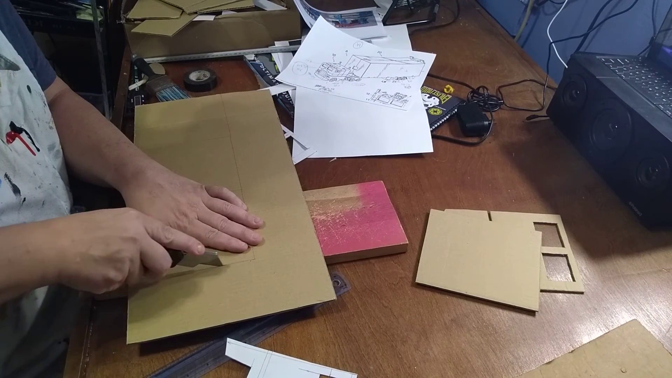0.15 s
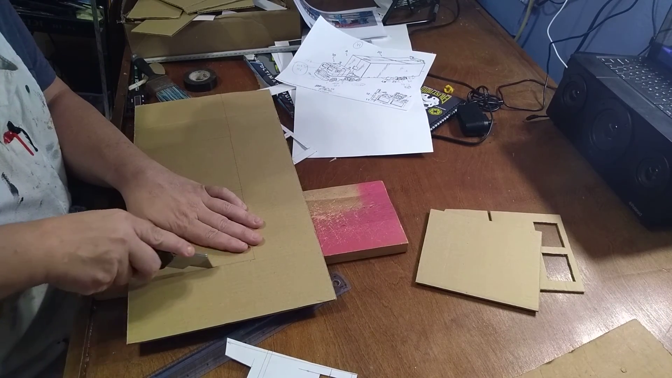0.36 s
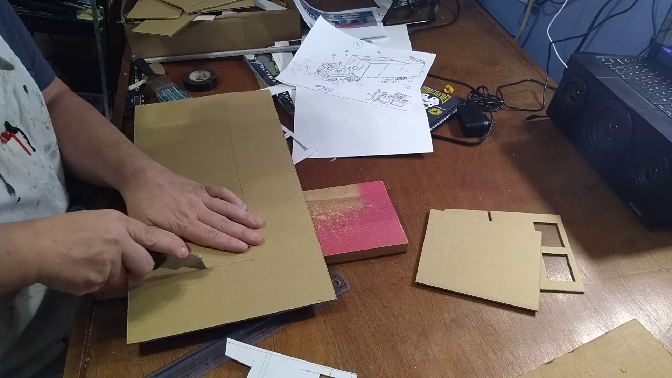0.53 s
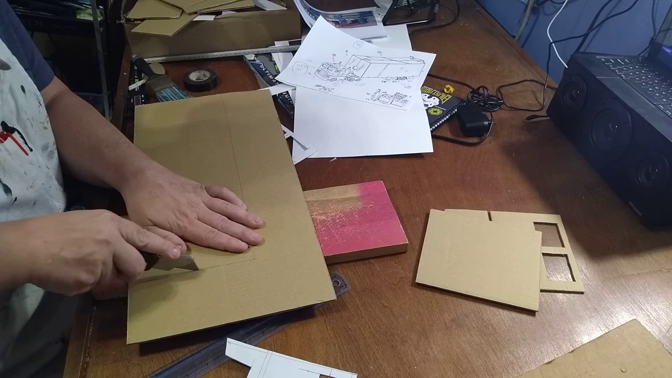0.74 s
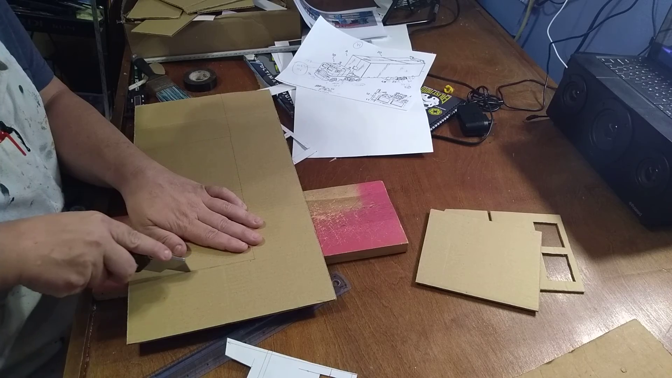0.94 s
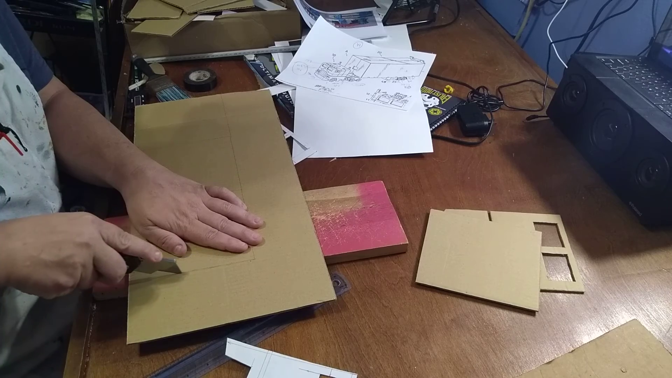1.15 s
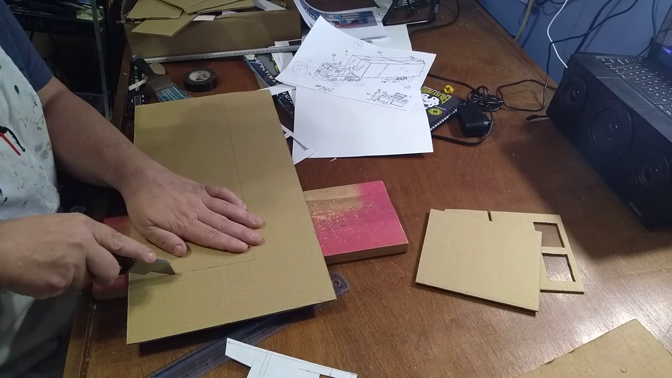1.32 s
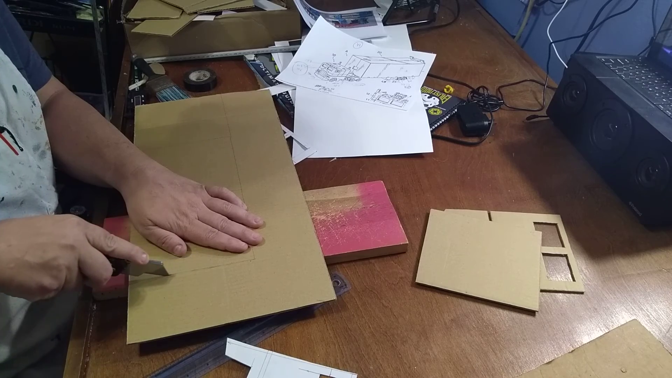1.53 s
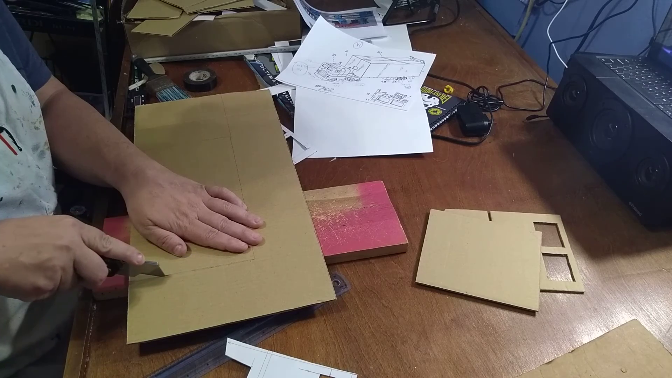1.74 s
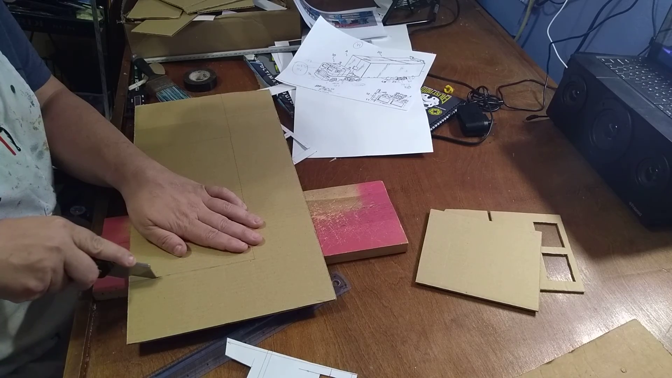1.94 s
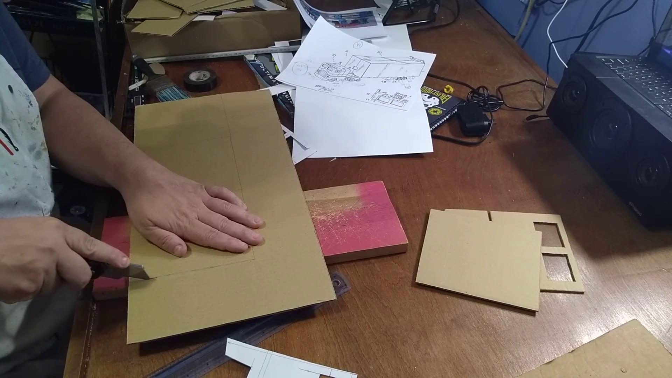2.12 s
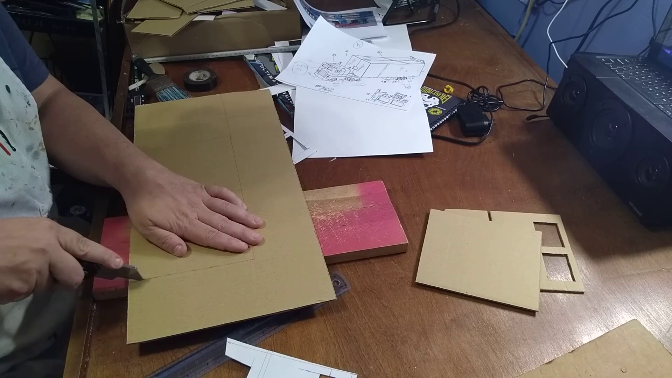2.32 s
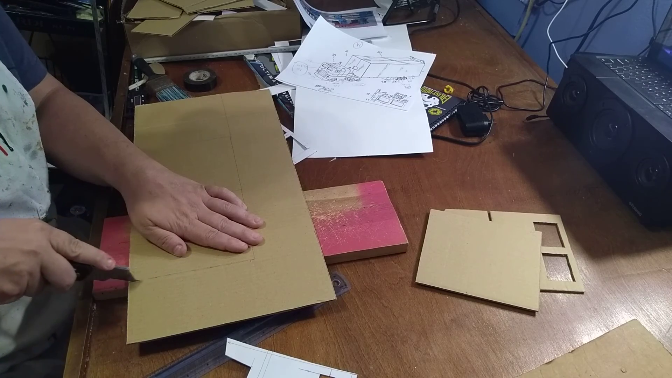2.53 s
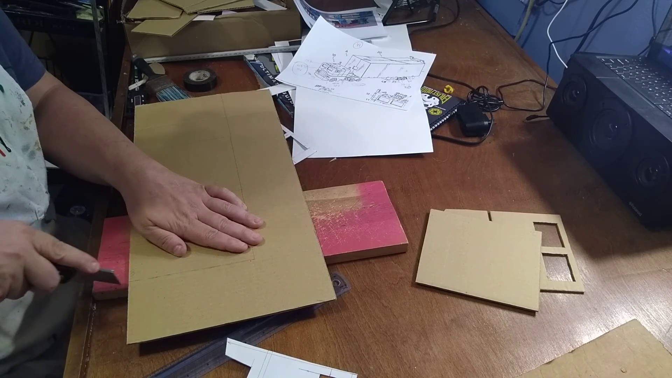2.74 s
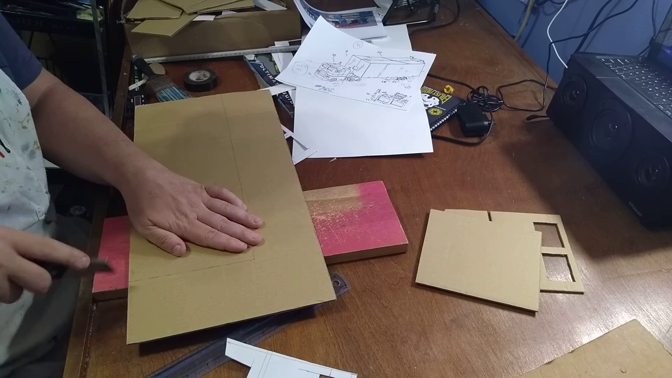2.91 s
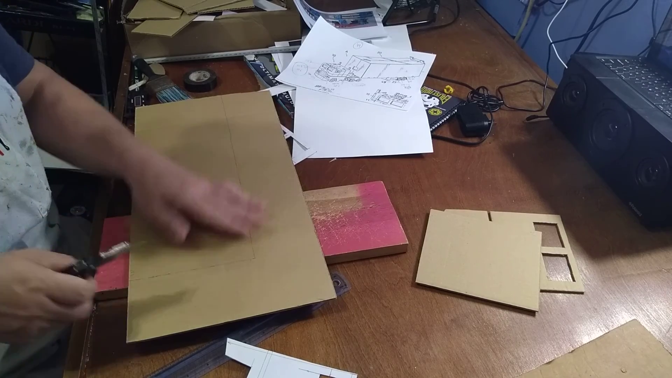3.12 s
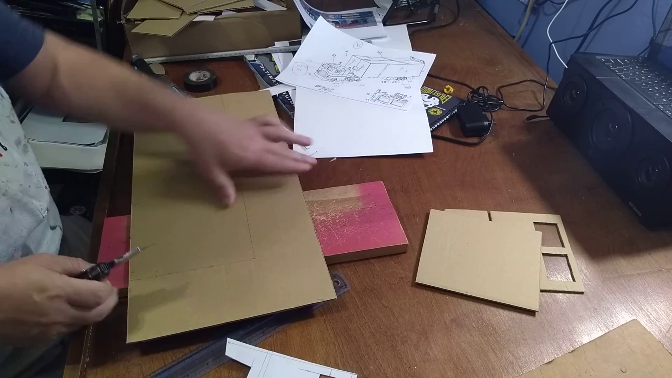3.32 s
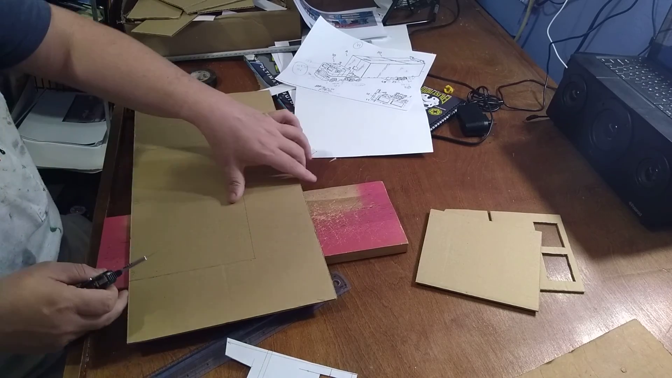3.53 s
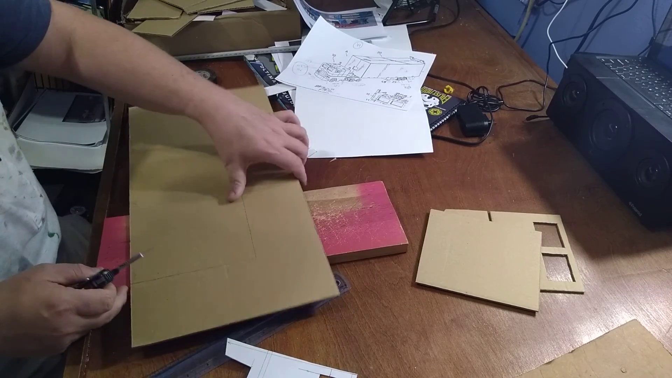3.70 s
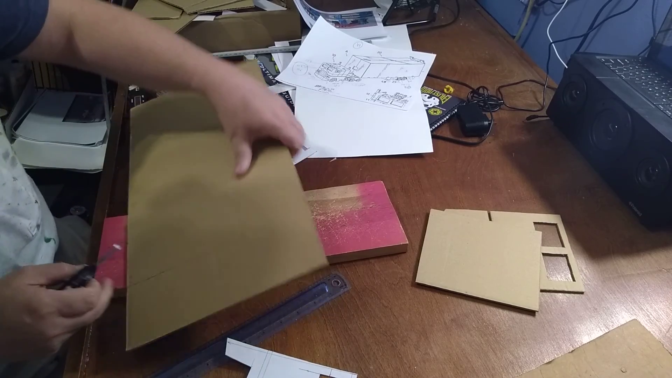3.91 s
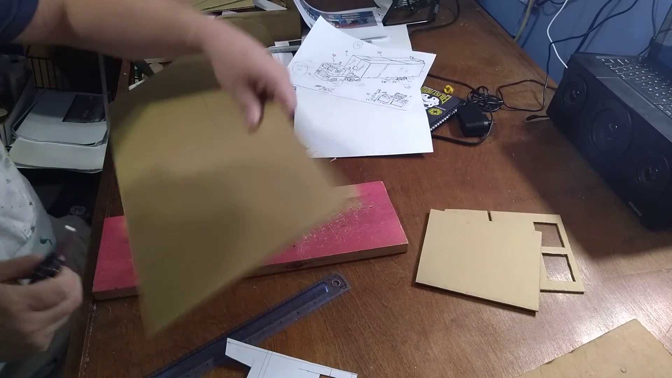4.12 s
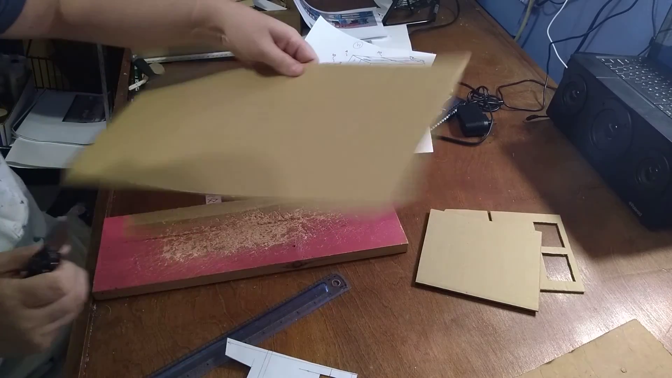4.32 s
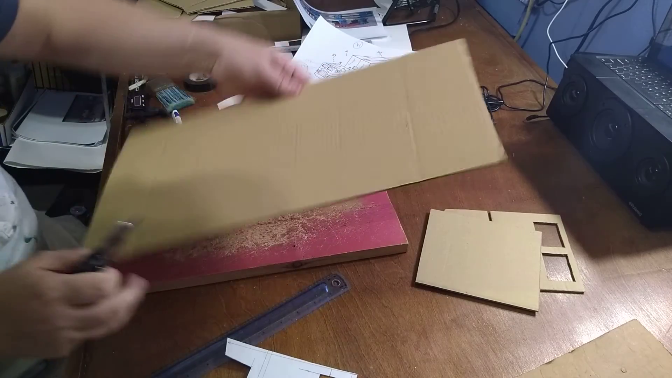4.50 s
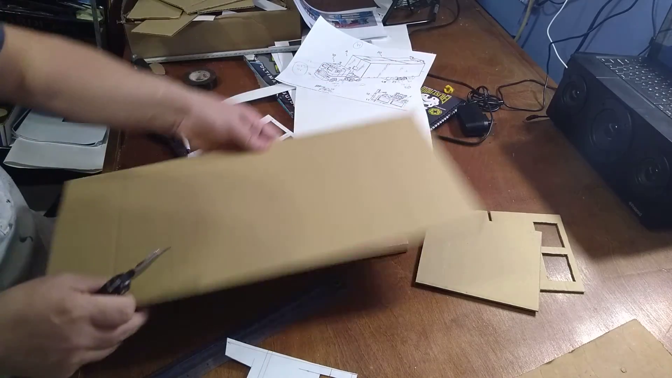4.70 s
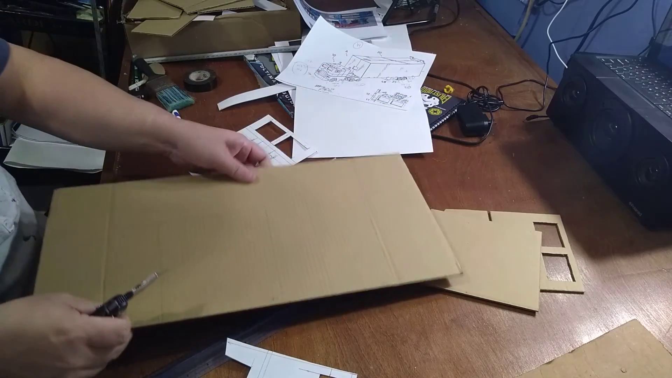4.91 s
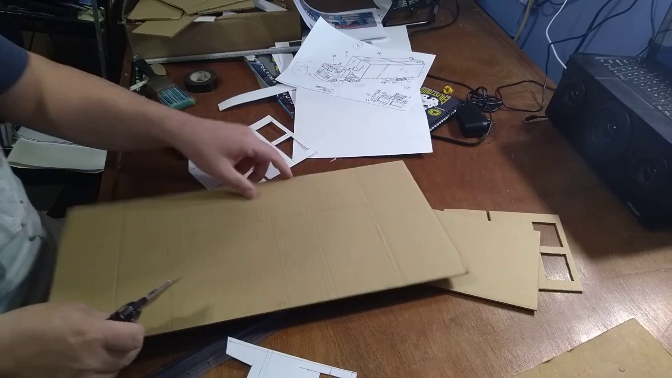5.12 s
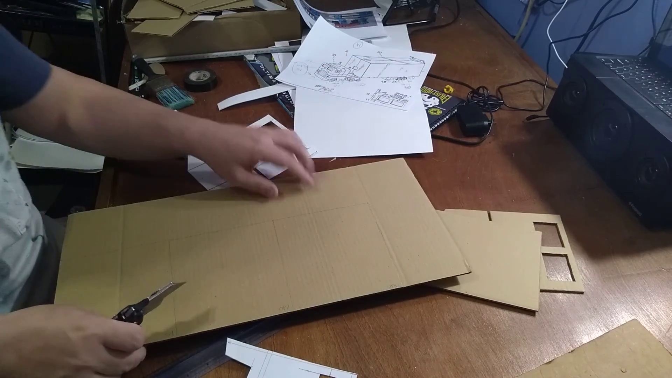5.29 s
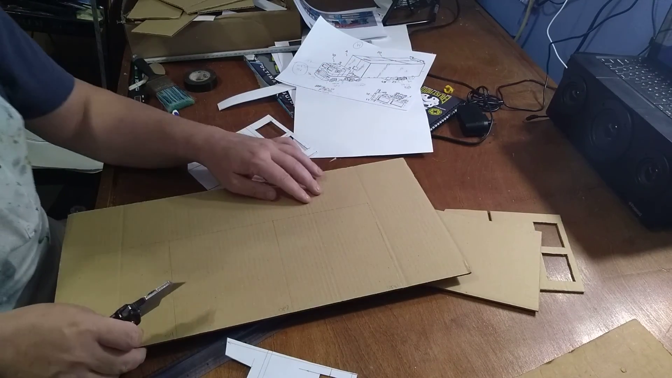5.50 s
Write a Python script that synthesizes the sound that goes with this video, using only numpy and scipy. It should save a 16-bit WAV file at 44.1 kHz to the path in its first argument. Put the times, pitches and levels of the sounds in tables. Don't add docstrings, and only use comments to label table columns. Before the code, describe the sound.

In a small room with a low fan hum, a utility knife tears steadily through corrugated cardboard for under three seconds, rasping and fizzing in uneven surges with a thin steely sing. The blade runs out, the sheet pats and knocks, hands slide and flex it, then it lands with a sharp slap, drums briefly and settles. Close microphone, wide stereo.

```python
import sys
import numpy as np
from scipy import signal
from scipy.fft import rfft, irfft, next_fast_len
from scipy.io import wavfile
from scipy.ndimage import uniform_filter1d, map_coordinates

SR = 44100
rng = np.random.default_rng(int(sys.argv[2]) if len(sys.argv) > 2 else 0)


def voltage_ratio(decibels):
    exponent = np.asarray(decibels, float) / 20
    return 10 ** exponent


def pcm_store(signal):
    levels = np.round(np.clip(np.atleast_2d(signal), -1, 1) * 32767)
    wavfile.write(sys.argv[1], SR, levels.astype(np.int16).T)


N = 244755

# (frequency [Hz], width [Hz], level [dB])
LOOSE_MODES = [(392, 35, -7.5), (611, 11, -5.5), (966, 190, -5.5), (1384, 16, -11), (1490, 28, -43)]


def unit(x):
    return x / np.sqrt(np.mean(x ** 2) + 1e-20)


def along(points, hz):
    f, v = np.transpose(points)
    return np.interp(np.log(hz + 1), np.log(f + 1), v)


def wobble(rate_hz):
    knots = rng.standard_normal(int(N * rate_hz / SR) + 4)
    return map_coordinates(knots, [np.arange(N) * rate_hz / SR])


def sampled(x):
    return np.interp(np.arange(N) / SR * 1000, np.arange(len(x)), x)


def away(start_s, rise_s, hold_s, fall_s):
    t = np.arange(0, N / SR + .002, .001)
    before = (start_s - t) / rise_s
    after = (t - start_s - hold_s) / fall_s
    return np.maximum(np.maximum(before, after), 0)


def bumped(*shape):
    return np.maximum(1 - away(*shape), 0)


def swells(rows):
    power = sum(voltage_ratio(db - 20 * away(*shape)) ** 2 for *shape, db in rows)
    return sampled(np.sqrt(power))


def filtered(x, response):
    m = next_fast_len(N + SR // 2)
    return irfft(rfft(x, m) * response(np.fft.rfftfreq(m, 1 / SR)), m)[..., :N]


def modes(f, peaks):
    total = 0
    for k, (centre, width, db) in enumerate(peaks):
        damping = 1j * f * width
        total = total + (-1) ** k * voltage_ratio(db) * damping / (centre * centre - f * f + damping)
    return total


def at_ports(pair, response):
    # (frequency [Hz], likeness [-1..1])
    likeness = [(30, .9), (80, 0.93), (300, 0.93), (600, 0.64), (1100, -0.21), (3200, -0.23), (6000, 0.087),
                (12000, 0.37)]
    turn = lambda f: np.arccos(np.clip(along(likeness, f), -1, 1)) / 2
    mid, side = filtered(pair, lambda f: response(f) * [np.cos(turn(f)), np.sin(turn(f))])
    return unit(np.array([mid + side, mid - side]))


def rumble():
    # (time [s], rise [s], hold [s], fall [s], level [dB])
    jolts = [
        (.26, 0.089, .05, 1, -52.5),
        (2.7, 0.26, .05, 0.53, -54.5),
        (3.2, .2, 0.018, 0.16, -61),
        (4, .3, .05, 0.51, -60.5),
        (5, .02, 0.064, 0.35, -54),
        (2.93, .08, 0.034, .15, -56),
        (5.12, .08, .16, .15, -52),
        (5.44, .1, 0.016, .15, -55.5),
    ]
    steady_db, of_pressure_db, sway_db = -61.5, -17.5, 1.64
    power = voltage_ratio(2 * steady_db) + (voltage_ratio(of_pressure_db) * blade()[0]) ** 2 + swells(jolts) ** 2
    return np.sqrt(power) * voltage_ratio(sway_db * wobble(6.9))


def fan():
    # (frequency [Hz], level [dB per Hz])
    air_colour = [(80, -39), (200, 5.5), (450, -7.5), (900, -8.5), (2300, -11), (5000, -14.5), (9000, -16),
                  (14000, -38)]
    # (frequency [Hz], level [dB per Hz])
    low_colour = [(15, -13), (35, -4), (62, -2), (120, -0.5), (200, -9.5), (320, -31.5)]
    # (frequency [Hz], level [dB rms])
    hum_tones = [(63, -60), (119.6, -62), (208, -64), (361, -64), (479, -63.5), (598, -74)]
    # (time [s], rise [s], hold [s], fall [s], level [dB])
    shade = (5, 0.3, 0.4, 0.26, -4.5)
    t = np.arange(N) / SR
    air = at_ports(rng.standard_normal((2, N)), lambda f: voltage_ratio(along(air_colour, f)))
    low = at_ports(rng.standard_normal((2, N)), lambda f: voltage_ratio(along(low_colour, f)))
    hum = 0
    for hz, db in hum_tones:
        level = voltage_ratio(db + 5.0 + 3.2 * wobble(9))
        drift = hz / 220 * wobble(24)
        port_drift = 0.43 * np.array([wobble(3.0), wobble(2.95)])
        hum = hum + level * np.sin(2 * np.pi * hz * t + drift + port_drift)
    air_db = -52.0 + shade[4] * sampled(bumped(*shade[:4])) + 1.73 * wobble(3.144)
    return voltage_ratio(air_db) * air + voltage_ratio(7.5) * rumble() * low + hum


def bump():
    # (time [s], peak [dB], pitch [Hz], t60 [s])
    jolt = (2.5, -43, 59.5, 1.5)
    start_s, db, hz, t60_s = jolt
    t = np.clip(np.arange(N) / SR - start_s, 0, None)
    return voltage_ratio(db - 60 * t / t60_s) * np.sin(2 * np.pi * hz * t) * [[1], [-.3]]


def contacts(rows, attack_s):
    out, t = np.zeros(N + SR), np.arange(SR // 10) / SR
    for start_s, db, hz, t60_s in rows:
        ring = np.sin(2 * np.pi * hz * t) * (1 - np.exp(-t / attack_s))
        out[round(start_s * SR):][:len(t)] += voltage_ratio(db - 60 * t / t60_s) * ring
    return out[:N]


def bright_ticks():
    # (time [s], peak [dB], pitch [Hz], t60 [s])
    catches = [(3.7027, -26, 10300, .004), (3.7027, -34, 11800, .004), (4.9988, -27, 10000, .002),
               (4.9988, -30, 13800, .002), (4.1608, -37, 12200, .006), (4.1628, -34, 12100, .005),
               (4.1628, -37, 9100, .005), (4.1647, -35, 12000, .006), (4.167, -37, 12000, .006),
               (4.1691, -40, 11900, .005), (4.6506, -28, 2300, .004), (4.6557, -20, 9760, .004),
               (4.6619, -11, 9500, .004), (4.6619, -21, 7700, .004), (4.6626, -27, 12300, .008),
               (4.6627, -14, 10300, .006), (1.8992, -34, 12300, .008), (1.9689, -32, 12300, .008),
               (2.0122, -30, 12400, .012), (2.0981, -37, 12200, .008), (2.2, -31, 12300, .008),
               (2.2585, -31, 12200, .006), (2.263, -31, 12200, .006), (2.3516, -33, 12300, .008),
               (2.5396, -33, 12300, .008), (2.6274, -30, 12300, .008)]
    return contacts(catches, attack_s=.00015)


def edge_pats():
    # (time [s], peak [dB], pitch [Hz], t60 [s])
    short_rings = [(2.8358, -28, 610, 0.022), (2.8505, -33, 780, .02), (3.033, -36, 1010, .02),
                   (3.034, -37, 1600, .02), (3.078, -39, 1200, .03), (3.155, -44, 870, .04),
                   (3.159, -39.5, 1595, .03), (3.213, -46, 1000, .02), (3.7033, -30, 1000, 0.02),
                   (3.724, -36, 1200, 0.048), (3.968, -33, 980, 0.037), (3.973, -27.5, 614, .03),
                   (3.977, -30, 991, 0.027), (3.975, -34, 3590, 0.038), (3.988, -32, 990, 0.026),
                   (4.646, -32, 640, 0.046), (4.651, -36, 1380, .02), (4.654, -29, 990, .03),
                   (4.66, -28, 984, .03), (4.672, -26.5, 590, .05), (4.677, -32.5, 1356, 0.071),
                   (4.683, -31, 600, .05), (4.692, -27, 598, 0.045), (4.7, -33, 800, 0.044),
                   (4.708, -30, 417, 0.046), (4.753, -38, 783, .03), (4.7685, -26.5, 590, .03),
                   (4.774, -32.5, 967, .05), (4.798, -32, 957, .04), (4.812, -37, 796, .04),
                   (4.826, -40, 600, .03), (4.853, -41, 565, .04), (5.014, -25.5, 598, .05),
                   (5.024, -33, 600, .05), (5.04, -34, 1230, .05), (5.055, -34, 1690, .03),
                   (5.066, -36, 1230, .06), (5.078, -35, 480, .05), (5.168, -36.5, 813, .04),
                   (5.174, -38, 1394, .03), (5.19, -33, 520, 0.05), (5.202, -35, 600, .03),
                   (5.227, -33, 750, .03), (5.234, -32, 420, .04), (2.842, -35, 720, .03),
                   (2.865, -37, 900, .03),
                   (2.558, -39, 1160, .1), (2.572, -39, 1180, .08), (2.59, -42, 1250, .06),
                 (2.61, -43, 1080, .08), (2.638, -40, 1110, .06), (2.645, -38, 900, .05),
                 (2.648, -35, 620, .04), (2.69, -45, 930, .08), (2.705, -40, 600, .05),
                 (2.735, -47, 1150, .08), (2.76, -46, 900, .06), (2.8545, -37, 3400, .012),
                 (3.9735, -22, 850, .012), (4.6465, -34, 950, .025), (4.668, -31, 400, .05),
                 (4.684, -31, 380, .05), (4.79, -36, 420, .05), (5.008, -28, 400, .06),
                 (5.045, -33, 380, .06), (3.0345, -42, 3300, .01), (3.159, -42, 3100, .012)]
    return contacts(short_rings, attack_s=0.001)


def knocks():
    # (time [s], peak [dB], tick [dB], t60 [s])
    pushes = [(2.835, -36, -60, 0.067), (3.033, -38, -52, 0.081), (3.076, -35, -45, 0.13),
              (3.152, -30.5, -33.5, 0.17), (3.703, -30, -36, 0.12), (4.161, -39, -45, 0.16),
              (4.651, -24, -35, 0.19), (4.662, -28, -24, 0.15), (4.768, -34, -41, 0.22),
              (5.169, -29, -55, 0.068), (5.188, -28, -60, .07), (5.225, -32, -61, 0.11),
              (5.518, -39, -55, 0.15)]
    # (time [s], peak [dB])
    fibre_snaps = [(0.2463, -9), (0.2954, -20), (0.952, -13), (1.0774, -20), (1.397, -28), (2.0981, -18),
                   (2.8827, -21), (3.3677, -41), (4.759, -38.5), (4.8713, -41), (5.3338, -31)]
    out, t = np.zeros(N + SR), np.arange(SR // 4) / SR
    for start_s, db, tick_db, t60_s in pushes:
        hz, _, level_db = np.transpose(LOOSE_MODES)[..., None]
        hz = hz * (1 + 0.0403 * rng.standard_normal(hz.shape))
        drift = 0.032 * np.cumsum(rng.standard_normal((len(hz), len(t))), axis=1)
        uneven = voltage_ratio(level_db + rng.normal(0, 4.5, hz.shape))
        ring = (uneven * np.sin(2 * np.pi * hz * t + drift)).sum(0) * (1 - np.exp(-t / 0.001))
        tick = np.diff(rng.standard_normal(len(t) + 1)) * voltage_ratio(tick_db - 8.0 - 60 * t / .02)
        out[round(start_s * SR):][:len(t)] += voltage_ratio(db - 14.5 - 60 * t / t60_s) * ring + tick
    for start_s, db in fibre_snaps:
        snap = np.diff(rng.standard_normal(len(t) + 1))
        out[round(start_s * SR):][:len(t)] += voltage_ratio(db - 16.0 - 60 * t / 0.005) * snap
    return out[:N]


def slap():
    # (time [s], peak [dB], pitch [Hz], t60 [s])
    cracks = [
        (5.0003, -18.5, 950, 0.01),
        (4.9988, -7, 1840, 0.0032),
        (4.9988, -17, 2330, 0.006),
        (4.9988, -7, 2880, 0.0028),
        (5.0068, -21, 740, 0.014),
        (5.2247, -25.5, 2070, 0.0053),
        (5.231, -30.5, 400, 0.05),
        (3.0765, -34, 2120, 0.0068),
        (2.8, -44, 1230, 0.009),
        (3.867, -41, 1200, 0.066),
    ]
    # (frequency [Hz], level [dB], t60 [s])
    drum_modes = [(457, -14, 0.89), (595, 0, 0.11), (1230, -4, 0.098), (1740, -17, 0.81), (2240, -29, 0.12),
                  (3080, -39, 0.27)]
    t = np.clip(np.arange(N) / SR - np.transpose(cracks)[0][:, None], 0, None)
    crack = sum(voltage_ratio(db - 60 * u / t60_s) * np.sin(2 * np.pi * hz * u)
                for u, (_, db, hz, t60_s) in zip(t, cracks))
    since = t[0]
    drum = sum(voltage_ratio(db - 60 * since / min(t60_s, .3)) * np.sin(2 * np.pi * hz * since)
               for hz, db, t60_s in drum_modes)
    return crack + voltage_ratio(-25) * drum * (1 - np.exp(-since / .006))


def fibres(per_s, spread_db):
    size = (rng.random(N) < per_s / SR) * voltage_ratio(spread_db * rng.exponential(size=N))
    burst = signal.lfilter([1], [1, -.93], size)
    z = signal.stft((burst + 1.02) * rng.standard_normal((2, N)), nperseg=512)[2]
    patches = uniform_filter1d(rng.standard_normal(z.shape[1:]), size=5, axis=0)
    patches = uniform_filter1d(patches, size=7, axis=1)
    return signal.istft(z * voltage_ratio(1.91 * unit(patches)), nperseg=512)[1][:, :N]


def friction(drive, peaks, bright, ring, per_s, spread_db, flutter_db, sing):
    # (frequency [Hz], level [dB per Hz])
    flex_colour = [(100, -16), (220, -3.5), (420, 0), (700, -3), (1000, -11), (1600, -50.5)]
    # (frequency [Hz], level [dB per Hz])
    shake_colour = [(450, -39), (800, -10), (1050, -1.5), (1500, -1.5), (2200, -7), (3500, -35)]
    # (frequency [Hz], level [dB per Hz])
    tear_colour = [(1000, -7.5), (2000, 1), (3000, 0), (4500, -3.5), (6500, -8.5), (10000, -16)]
    # (frequency [Hz], width [Hz], level [dB])
    steel_modes = [(12400, 730, -0.5)]
    sing_from_db, sing_growth = -37, 0.54
    flex, shake, tear, fizz = drive
    flutter = flutter_db * (wobble(18) + .5 * wobble(85))

    def sheet(colour):
        response = lambda f: voltage_ratio(along(colour, f)) * (1 + ring * np.abs(modes(f, peaks)))
        return at_ports(fibres(per_s / 2, spread_db), response)

    rasp = at_ports(fibres(per_s, spread_db), lambda f: voltage_ratio(along(tear_colour, f)))
    hiss = at_ports(fibres(per_s * 2, spread_db), lambda f: voltage_ratio(along(bright, f)))
    steel = filtered(hiss, lambda f: np.abs(modes(f, steel_modes)))
    hiss = hiss + sing * (fizz / voltage_ratio(sing_from_db)) ** sing_growth * steel
    body = voltage_ratio(-1.5) * flex * sheet(flex_colour) + voltage_ratio(-4.0) * shake * sheet(shake_colour)
    return voltage_ratio(flutter) * (body + voltage_ratio(2.0) * tear * rasp + voltage_ratio(-3.0) * fizz * hiss)


def hands():
    # (time [s], rise [s], hold [s], fall [s], level [dB])
    slides = [(2.883, 0.011, .002, 0.055, -45), (3.02, 0.054, 0.092, 0.14, -46),
              (3.157, .04, .002, .03, -46), (3.372, 0.024, 0.035, 0.086, -45), (3.49, .04, .19, .05, -52),
              (3.703, .002, 0.028, 0.074, -38), (3.88, .2, .02, .1, -41), (3.966, 0.15, 0.025, 0.11, -32.5),
              (4.07, .03, .02, .12, -44), (4.163, .003, 0.024, 0.13, -42), (4.2, 0.068, .13, 0.1, -42.5),
              (4.39, .05, .05, .076, -45), (4.514, .02, .002, 0.32, -48.5), (4.656, .005, .003, .02, -36),
              (4.664, .004, .002, 0.065, -29.5), (4.76, .005, 0.022, 0.055, -39),
              (4.872, .01, .05, .05, -46.5), (4.94, 0.12, 0.06, 0.06, -44), (5.17, .05, 0.01, 0.028, -47),
              (5.336, 0.006, .002, 0.085, -52), (5.412, .02, .01, .05, -53), (5.48, .04, .02, .05, -55),
              (5.548, 0.037, .002, .1, -46.5)]
    # (time [s], rise [s], fall [s], level [dB], liner over sheet [dB])
    bends = [(2.76, 0.028, 0.042, -48, -1), (2.815, .03, 0.036, -54, -7), (2.836, 0.0065, 0.085, -37.5, -2),
             (3.036, .003, .03, -54, 9), (3.08, 0.021, 0.057, -52.5, 12), (3.158, 0.026, 0.062, -50, 6.5),
             (3.53, .1, 0.73, -52.5, 1.5), (3.703, .004, .04, -44, 5), (3.726, 0.04, 0.045, -42, 1),
             (3.8, 0.056, 0.22, -43, -2.5), (3.874, 0.037, 0.033, -43, -1), (3.935, .05, .05, -42, 2.5),
             (3.974, 0.04, 0.085, -35, 2.5), (4.3, 0.37, .4, -59, -4), (4.438, 0.046, 0.047, -53, 1),
             (4.57, 0.055, 0.074, -44.5, -8), (4.651, .005, .05, -38, 2.5),
             (4.685, 0.077, 0.057, -34.5, -7), (4.777, 0.043, 0.11, -40.5, -4),
             (4.95, 0.012, 0.17, -59, 19), (5.004, .002, .1, -34, -2), (5.1, .1, 0.25, -53, 1),
             (5.17, .012, 0.06, -40, -3), (5.227, 0.011, 0.069, -38.5, -12), (5.542, 0.03, 0.033, -60, 8)]
    flex = swells([(s, rise, 0, fall, db) for s, rise, fall, db, _ in bends])
    shake = swells([(s, rise, 0, fall, db + liner_db) for s, rise, fall, db, liner_db in bends])
    fizz = swells(slides)
    scrape = np.hypot(voltage_ratio(-12) * fizz, voltage_ratio(-8) * shake)
    return flex, shake, scrape, fizz


def handling():
    # (frequency [Hz], level [dB per Hz])
    skin_colour = [(3000, -4.5), (5500, 0), (8000, 2), (10000, 6.5), (12000, 0), (14000, -5)]
    return friction(hands(), LOOSE_MODES, skin_colour, ring=2.1, per_s=2000, spread_db=2.2,
                    flutter_db=0.9, sing=0.15)


def blade():
    # (time [s], pressure [dB], speed [dB])
    stroke = [
        (0.0, -44.5, -43.5),
        (0.2, -43.5, -40),
        (1.24, -39.5, -37.5),
        (1.75, -42.5, -45.5),
        (1.92, -37.5, -32),
        (2.13, -44, -40.5),
        (2.63, -41.5, -34),
        (2.69, -41, -52.5),
        (2.76, -43.5, -63),
    ]
    # (time [s], rise [s], fall [s], more pressure [dB], more speed [dB])
    lunges = [(.045, .04, 0.043, 4.5, 2.5), (.18, 0.048, 0.074, -1.5, 5), (.282, 0.06, 0.08, 5.5, 5.5),
              (.44, 0.067, 0.085, 0, -2), (.65, 0.049, 0.047, 1, 1), (.705, .03, 0.035, -2, -3),
              (1.02, 0.19, 0.07, 2.5, 3), (1.14, 0.05, 0.12, 0, -3.5), (1.31, 0.049, .02, 2, 0.5),
              (1.53, 0.12, 0.055, 1.5, 4.5), (1.6, 0.036, 0.076, -3, -3.5), (2.02, 0.091, 0.029, 0, 1),
              (2.085, 0.046, 0.017, 1, -5), (1.84, .08, .05, -1, -3), (2.105, .01, 0.052, 3, 1.5),
              (2.2, 0.068, 0.058, -0.5, 2.5), (2.3, 0.072, 0.068, 4, 2.5), (2.46, 0.027, .03, 1, 1),
              (2.51, 0.044, 0.043, -3, -3), (2.58, 0.027, 0.034, 2, 5.5), (2.645, 0.028, 0.034, 7, 4)]
    # (level over the drive [dB], share of speed in it [0..1])
    shares = [(-2, 0.1), (-1.5, 0.26), (-9, 0.24), (1, 0.98)]
    s, *drive = np.transpose(stroke)
    more = sum(np.outer(db, bumped(at, rise, 0, fall)) for at, rise, fall, *db in lunges)
    t = np.arange(N) / SR
    pressure, speed = [np.interp(t, s, c, right=-120) + sampled(m) for c, m in zip(drive, more)]
    return [voltage_ratio(db + share * speed + (1 - share) * pressure) for db, share in shares]


def cutting():
    # (frequency [Hz], width [Hz], level [dB])
    held_modes = [(391.6, 48, 6.5), (670, 43, 2), (928, 11.4, 6), (1190, 16, 12.5), (1332, 25.6, 11),
                  (1497, 27, 9.5), (1666, 54, 9.5), (1872, 34, 3)]
    # (frequency [Hz], level [dB per Hz])
    fizz_colour = [(3000, -4.5), (5500, 2), (8000, 0.5), (10300, 0.5), (12000, 0.5), (14000, -5)]
    # (time [s], level [dB])
    tip_freedom = [(0, -2), (.45, -3), (.6, 2), (1.0, 1), (1.3, -1), (1.6, -5), (1.85, -3), (1.92, 0),
                   (2.08, 1), (2.12, 4), (2.35, 3), (2.6, 4), (2.7, 0)]
    free = voltage_ratio(np.interp(np.arange(N) / SR, *np.transpose(tip_freedom)))
    return friction(blade(), held_modes, fizz_colour, ring=1.47, per_s=3500, spread_db=0.8,
                    flutter_db=0.55, sing=0.75 * free)


def room(x, wet_db):
    # (frequency [Hz], t60 [s])
    decay = [(200, 0.27), (1000, 0.58), (4000, 0.25), (12000, 0.2)]
    hz, t, z = signal.stft(rng.standard_normal((2, SR // 2)), SR, nperseg=256)
    tail = signal.istft(z * voltage_ratio(-60 * t / along(decay, hz)[:, None]), SR, nperseg=256)[1]
    tail = tail / np.linalg.norm(tail[0])
    delayed = np.pad(x, (150, 0))[None]
    return voltage_ratio(wet_db) * signal.fftconvolve(delayed, tail, axes=1)[:, :N]


def screened(x):
    # (time [s], rise [s], hold [s], fall [s], level [dB], from [Hz])
    screen = (5.1, .07, .2, .03, -5, 3000)
    *shape, db, from_hz = screen
    treble = filtered(x, lambda f: 1 / (1 + (from_hz / (f + 1)) ** 4))
    return x + (voltage_ratio(db * sampled(bumped(*shape))) - 1) * treble


def scene():
    taps, bang = knocks() + edge_pats(), slap()
    near = cutting() + handling() + taps + bang + bright_ticks() + bump()
    return screened(near + room(taps, wet_db=-8.5) + room(bang, wet_db=-17) + fan())


def masked(x, sway_db, attack_db):
    # (frequency [Hz], level [dB])
    hidden = [(1100, -13.5), (2300, -12), (3500, -10), (4600, -5.5), (7000, -8), (11000, -13.5),
              (13500, -13)]
    # (time [s], level [dB])
    starved = [(0, 2.5), (.8, 1.5), (1.3, 0), (1.9, -2), (2.5, 0.5), (2.8, -2), (3.65, -2), (3.75, 2.5),
               (4.4, 3), (4.45, -1), (5.55, -0.5)]
    hz, t, z = signal.stft([x[0] + x[1], x[0] - x[1]], SR, nperseg=2048, window="cosine")
    power = np.abs(z) ** 2
    band = power[:, :1024].reshape(2, -1, 8, z.shape[2]).mean(2)
    band = np.repeat(band, 8, axis=1)[:, np.r_[:1024, 1023]]
    around = uniform_filter1d(power.sum(0), size=48, axis=0)
    mood = unit(uniform_filter1d(rng.standard_normal((129, z.shape[2])), size=3, axis=1))
    mood = np.repeat(mood, 8, axis=0)[:1025]
    limit = voltage_ratio(2 * along(hidden, hz)[:, None] + 2 * sway_db * mood) * around
    limit = limit * voltage_ratio(2 * np.outer(hz > 3500, np.interp(t, *np.transpose(starved))))
    faint = (hz[:, None] > 1500) & (power < voltage_ratio(2 * -8.7) * around)
    total = around[40:200].sum(0)
    steady = total < voltage_ratio(2 * attack_db) * np.roll(total, 1)
    above = hz[:, None] > 850
    dropped = above & steady & ((band < limit) | faint)
    mid, side = signal.istft(z * ~dropped, nperseg=2048, window="cosine")[1][:, :N]
    return np.array([mid + side, mid - side]) / 2


def low_pass(x):
    return signal.sosfilt(signal.butter(12, 15610, fs=SR, output="sos"), x)


def record(dry):
    # (frequency [Hz], share [0..1])
    cross = [(100, 0.9), (2300, 0.94), (4600, 0.39), (7000, 0.1), (14000, 0.038)]
    # (frequency [Hz], level [dB])
    tilt = [(300, 4.5), (1500, 4.5), (3000, -7), (7500, -1.5), (9500, -1), (12000, 2.5), (14000, -1.5)]
    cavity = [(12160, 980, 6.9), (15100, 410, 1.8)]  # (frequency [Hz], width [Hz], level [dB])
    # (frequency [Hz], level [dB])
    top_edge = [(13000, 0), (13600, 4), (14240, 5), (14340, -48), (15600, -65)]
    lag = lambda f: np.exp(1j * np.pi * np.maximum(f - 7650, 0) / 2300 * [[1], [-1]])
    port = lambda f: (1 + modes(f, cavity)) * voltage_ratio(along(tilt, f) * [[.5], [-.5]]) * lag(f)
    leak = lambda f: np.clip(along(cross, f), 0, 1) * np.exp(-2j * np.pi * f / 2325)
    heard = filtered(dry, port)
    wide = heard - filtered(heard[::-1], leak)
    mix = masked(filtered(wide, lambda f: voltage_ratio(along(top_edge, f))), sway_db=2.0, attack_db=7.5)
    return low_pass(mix)


dry = scene()
out = record(dry)
pcm_store(out)
```